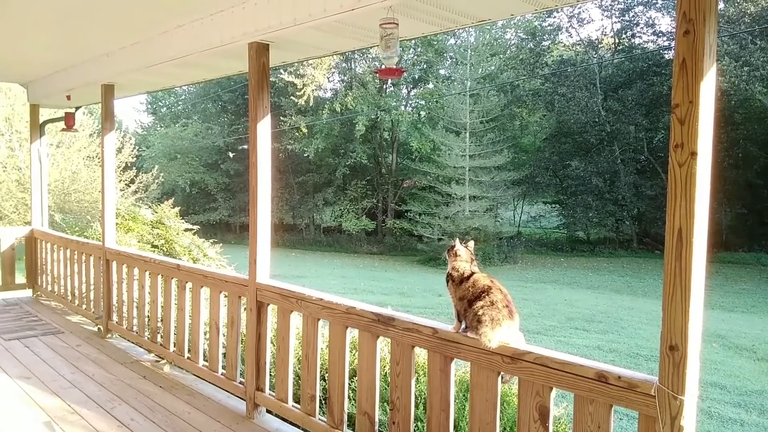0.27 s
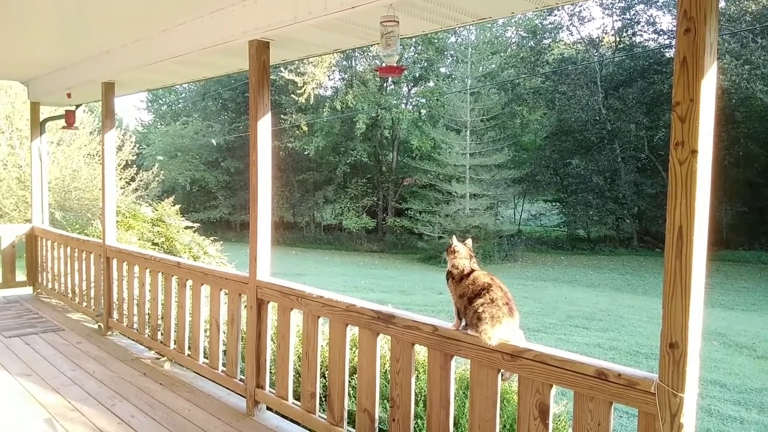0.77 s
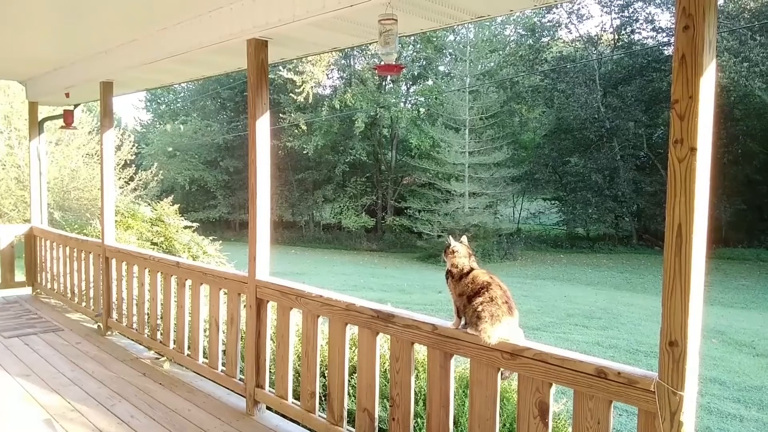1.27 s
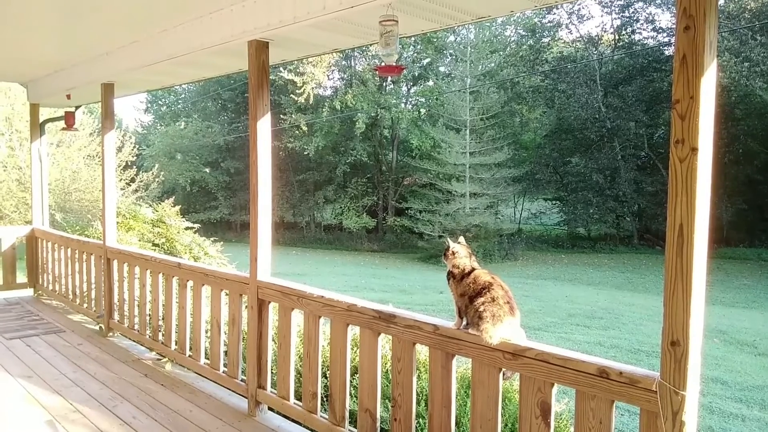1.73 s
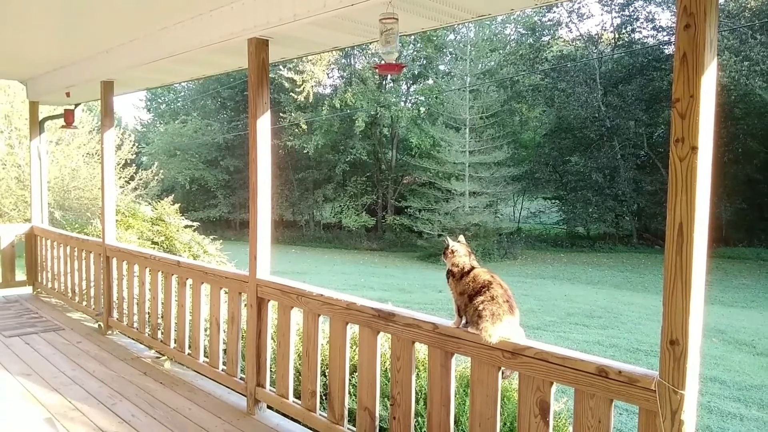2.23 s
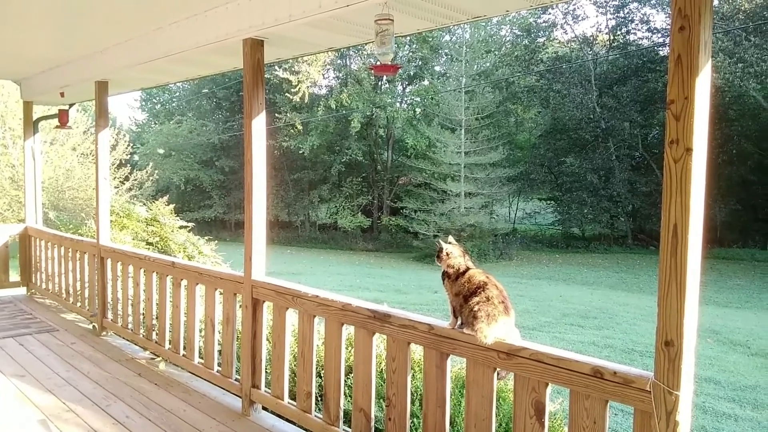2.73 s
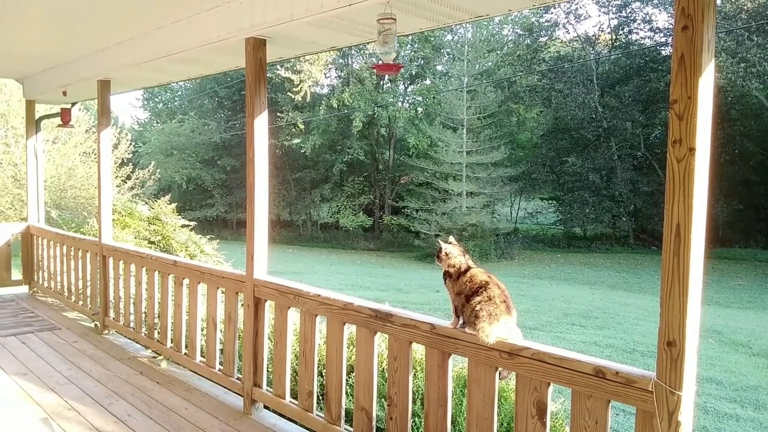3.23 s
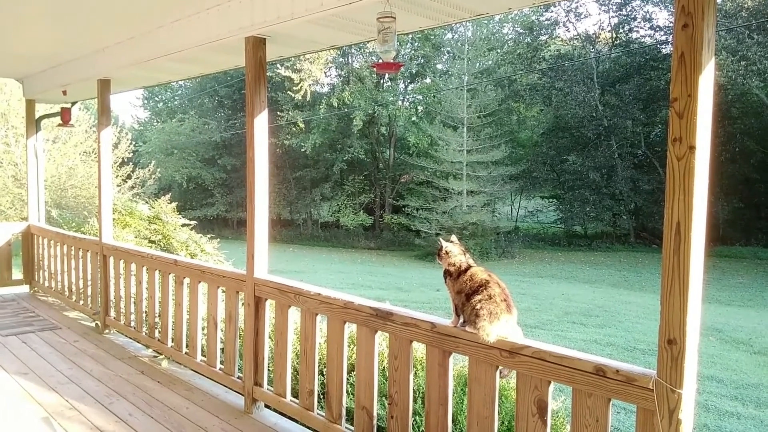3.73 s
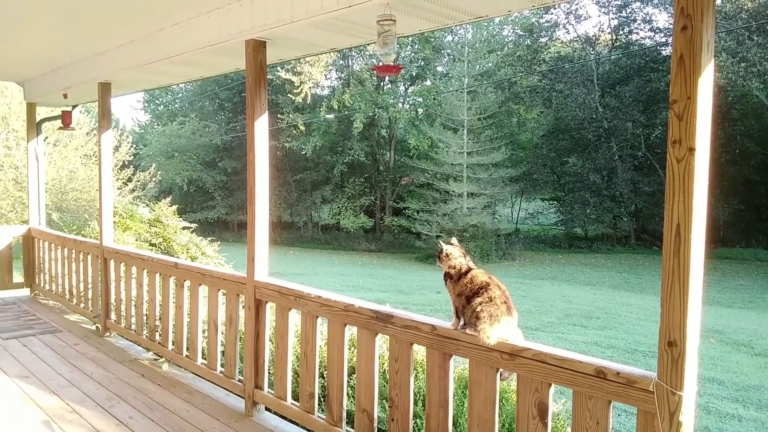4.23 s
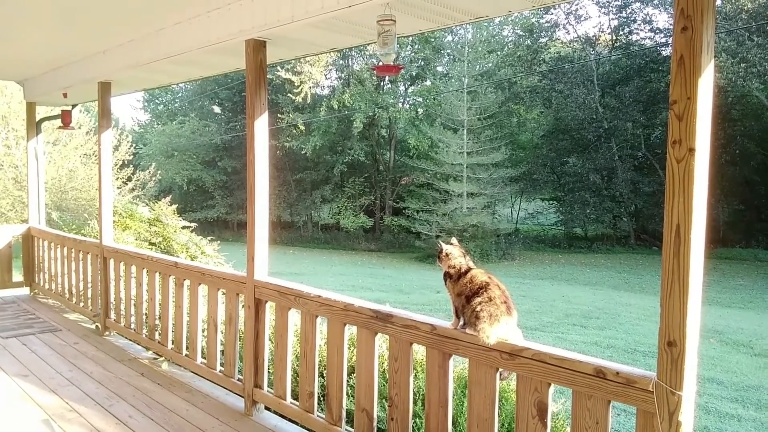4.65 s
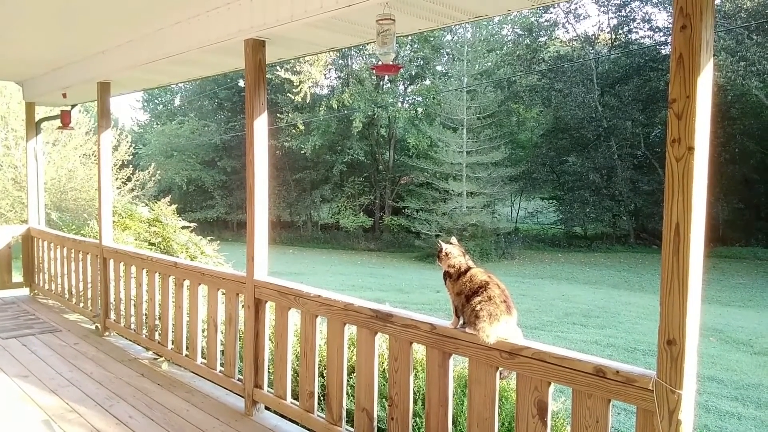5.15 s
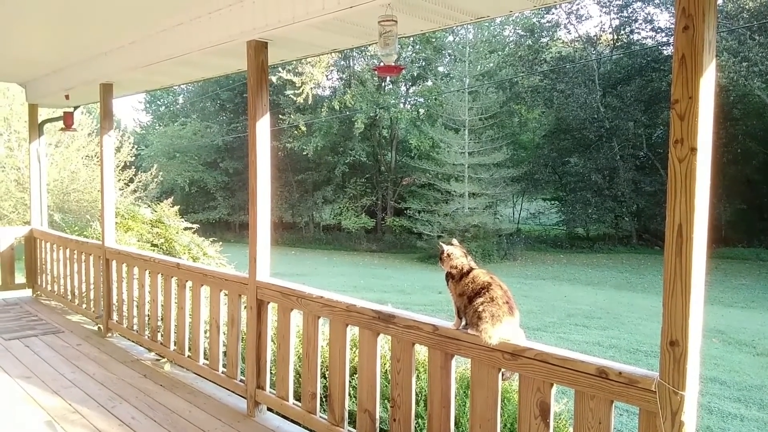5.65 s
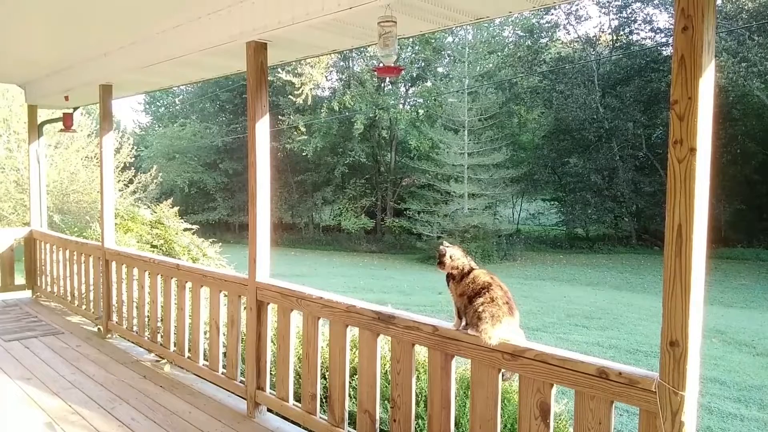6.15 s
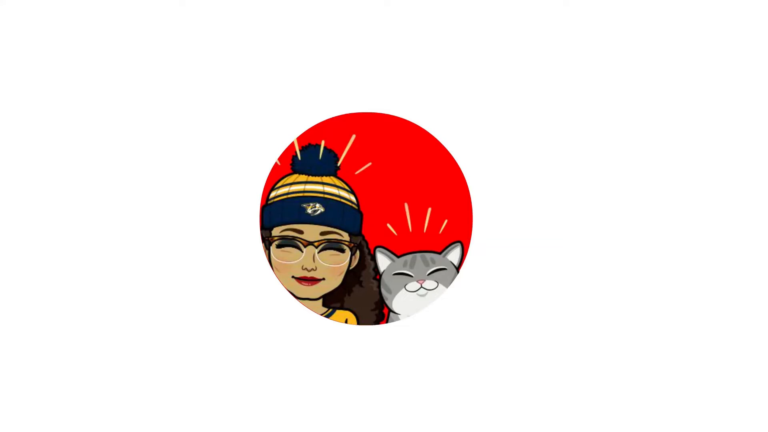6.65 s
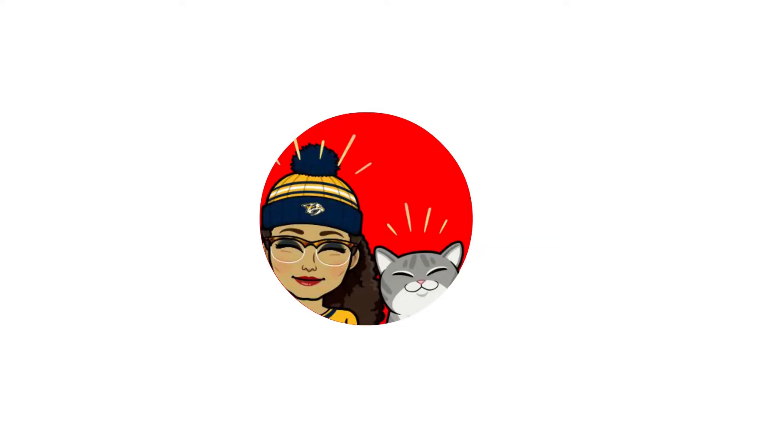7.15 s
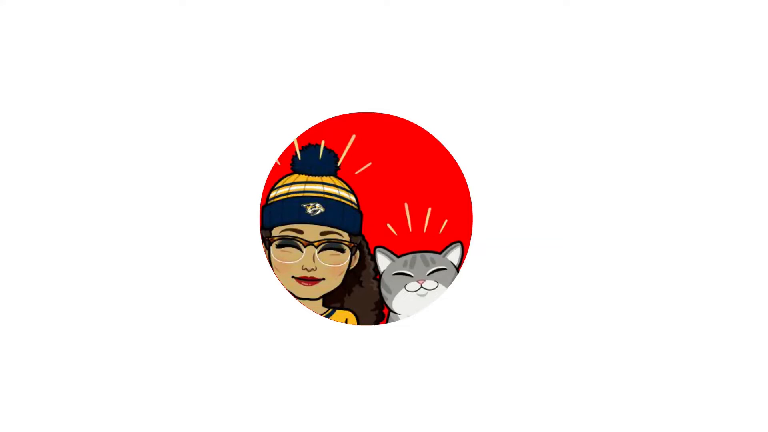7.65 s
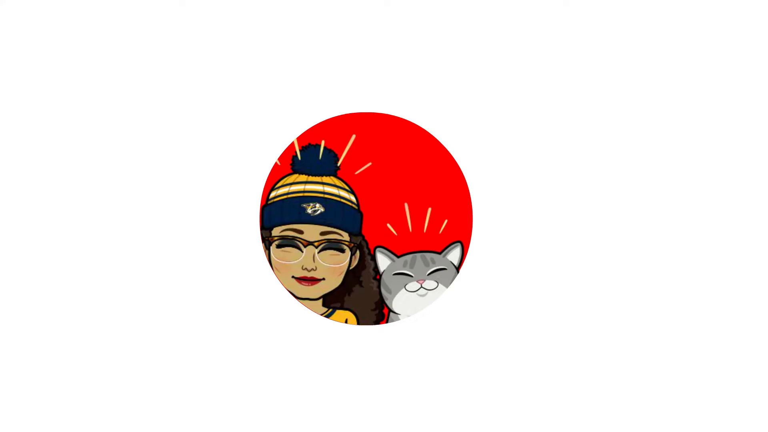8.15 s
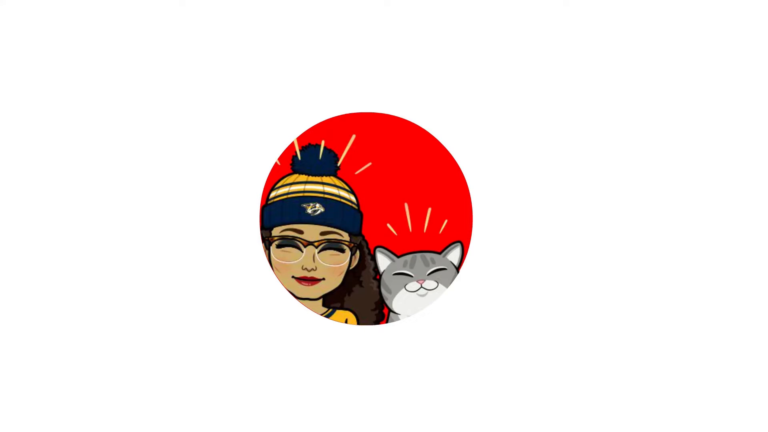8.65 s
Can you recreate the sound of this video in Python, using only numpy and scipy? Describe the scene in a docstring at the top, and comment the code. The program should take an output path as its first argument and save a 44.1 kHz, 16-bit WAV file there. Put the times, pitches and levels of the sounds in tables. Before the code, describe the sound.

On a wooden porch, hummingbirds open with a dense burst of harsh, fast-falling chips and thin peeps, wings humming low as they pass. Grass insects throb evenly around 5 kHz, with a near cricket. A faint distant songbird trills from the trees, then chips return sparsely and in a livelier flurry. Everything cuts out for an instant, after which mostly dry snaps and soft thumps sound over the insects. Handheld microphone, close birds, light porch echo.

```python
"""On a wooden porch, hummingbirds squabble round the feeders: harsh chips as swept, roughened harmonics, trembling
peeps, thin whistles and a very short tick as gliding tones, wings as pulses and noise that hum past or whirr
briefly at the clashes, and the clashes as ringing dry snaps. In the grass insects throb in step as bands of noise
with rising tones, and a near cricket chirps. A songbird repeats a phrase of quick glides from the trees, soft thumps
of low rumble reach the microphone, narrow noise swells over still air, and everything falls silent for an instant."""
import sys
import numpy as np
from scipy import signal
from scipy.fft import rfft, irfft
from scipy.io import wavfile
from scipy.ndimage import uniform_filter1d

SR = 44100
rng = np.random.default_rng(int(sys.argv[2]) if len(sys.argv) > 2 else 0)


def output_pcm(signal):
    """Save a mono or channel-first signal as 16-bit PCM at the path in sys.argv[1].

    Samples are clipped to [-1, 1] before scaling.
    """
    pcm = np.clip(np.atleast_2d(signal).T, -1, 1) * 32767
    wavfile.write(sys.argv[1], SR, np.round(pcm).astype(np.int16))


N = 392037
TIME = np.arange(N) / SR
CUTOFF_HZ = 15900  # top of the audible band in this scene


def from_db(db):
    """Decibels to amplitude gain."""
    return 10 ** (np.asarray(db) / 20)


def rms_one(x):
    """Scale to unit rms."""
    return x / np.sqrt(np.mean(x ** 2) + 1e-20)


def at_hz(points, hz):
    """Gain of a colour curve at given frequencies, joined in dB over log frequency."""
    known_hz, db = np.transpose(points)
    return from_db(np.interp(np.log(hz + 1e-9), np.log(known_hz), db))


def coloured(x, points):
    """Filter a steady sound to a colour curve; rms 1, so only the shape of the curve counts."""
    spectrum = rfft(x, 2 * N) * at_hz(points, np.fft.rfftfreq(2 * N, 1 / SR))
    return rms_one(irfft(spectrum)[:N])


def noise():
    """White noise for the whole scene."""
    return rng.standard_normal(N)


def drift(rate):
    """Random curve with this many new values per second, joined by straight lines; rms 1."""
    return rms_one(np.interp(TIME * rate, np.arange(N), noise()))


def add(out, start_s, sound):
    """Mix a sound in at a time."""
    at = int(np.clip(round(start_s * SR), 0, N))
    out[at:at + len(sound)] += sound[:N - at]


def glide(length_s, start_hz, end_hz):
    """Pitch curve and swell of one note."""
    u = np.linspace(0, 1, max(int(length_s * SR), 16))
    pitch_hz = start_hz * (end_hz / start_hz) ** u
    return pitch_hz, np.sqrt(np.abs(np.sin(np.pi * u)))


def excerpt(curve, start_s, length):
    """The stretch of a curve that lies under one note."""
    return curve[int(start_s * SR):][:length]


def phase_of(pitch_hz):
    """Running phase of a pitch curve, in radians."""
    return 2 * np.pi * np.cumsum(pitch_hz) / SR


def tail(t60_s, build_s):
    """Scattered echoes that build up and die away; energy 1."""
    t = TIME[:SR]
    echoes = rng.standard_normal(SR) * from_db(-60 * t / t60_s) * (1 - np.exp(-t / build_s))
    return echoes / np.linalg.norm(echoes)


def porch(x, ceiling_db, near_db, near_t60_s, late_db):
    """Direct sound, a ceiling bounce, the ring of the porch and a later, softer return from the garden; energy 1."""
    response = from_db(near_db) * tail(near_t60_s, 0.001) + from_db(late_db) * tail(0.21, 0.027)
    response[0] += 1
    add(response, 0.0046, from_db([ceiling_db]))
    return signal.fftconvolve(x, response / np.linalg.norm(response))[:len(x)]


# hummingbird chips: start_s [s], length_s [s], start_hz [Hz], end_hz [Hz],
# level_db [dB before swell, porch and final lift], roughness [0 clean, about 1 harsh]
CHIP_CALLS = [(0.001, 0.055, 8920, 8430, -51.5, 0.07), (0.052, 0.051, 4900, 4410, -52, 0.77),
              (0.245, 0.03, 5300, 4760, -44.5, 0.77), (0.36, 0.059, 7370, 6510, -32.5, 0.37),
              (0.393, 0.064, 3920, 3535, -41.5, 1.2), (0.482, 0.039, 4350, 2684, -35.5, 1.17),
              (0.574, 0.016, 3275, 2534, -32.5, 0.4), (0.636, 0.011, 2700, 1877, -38, 0.7),
              (0.741, 0.062, 1980, 2420, -59, 0.54), (0.784, 0.055, 2190, 2060, -50.5, 0.9),
              (0.872, 0.032, 5070, 2950, -50.5, 0.4), (2.011, 0.053, 1584, 1826, -42.5, 0.81),
              (2.019, 0.11, 8290, 8570, -42.5, 0.46), (2.204, 0.24, 3200, 3680, -59, 0.33),
              (2.33, 0.053, 2636, 2170, -52.5, 0.27), (2.804, 0.014, 2870, 2040, -56, 0),
              (2.905, 0.0053, 3000, 2320, -55, 0.5), (3.095, 0.0075, 9100, 8600, -57, 0.15),
              (3.489, .03, 2510, 2490, -60, 0.24), (3.616, 0.024, 2800, 2253, -46, 0.48),
              (3.923, 0.032, 2984, 2190, -48, 0.72), (4.244, 0.021, 2203, 1980, -51, 0.51),
              (4.497, 0.0067, 3530, 3120, -61, 0.28), (4.654, 0.033, 5200, 4760, -55.5, 0.82),
              (4.8, 0.029, 4740, 4020, -53.5, 0.9), (4.934, 0.12, 5260, 4860, -54, 0.46),
              (5.087, 0.063, 8700, 8300, -49, 0.7), (5.152, 0.07, 4780, 3170, -41, .45),
              (5.276, 0.039, 3206, 2873, -35.5, 0.67), (5.372, 0.028, 3600, 2220, -41.5, 0.86),
              (5.642, 0.033, 3400, 3140, -56.5, 0.65), (5.703, 0.014, 2280, 1860, -52, 0.35),
              (5.732, 0.0157, 2166, 1744, -51.5, 0.46), (5.755, 0.017, 2280, 2020, -51.5, 0.65),
              (5.943, 0.029, 2723, 2155, -44, 0.47), (8.394, 0.26, 5180, 5000, -53, 0.68)]
# voice colour of a chip: pitch_hz [Hz], level_db [dB, relative]
CHIP_TONE = [(1200, -41.5), (1900, 4), (3000, -12), (4200, -9.5), (5400, -2), (7100, -3.5), (8100, 6.5),
             (9200, 2), (10800, -2.5), (13000, -16), (16000, -21)]


def chips(jitter=0.0886, flutter_db=10.0, hiss=1.0):
    """A fast sweep of harmonics; an unsteady syrinx smears it, and rough chips carry hiss above the pitch."""
    out, wobble, flutter = np.zeros(N), drift(2600), np.tanh(drift(700))
    turbulence = coloured(noise(), CHIP_TONE)
    for start_s, length_s, start_hz, end_hz, level_db, rough in CHIP_CALLS:
        hz, swell = glide(length_s, start_hz, end_hz)
        phase = phase_of(hz * (1 + jitter * rough * excerpt(wobble, start_s, len(hz))))
        voice = np.zeros(len(hz))
        for k in range(1, 9):
            audible = k * hz < CUTOFF_HZ
            voice += at_hz(CHIP_TONE, k * hz) * audible * np.sin(k * phase) / k ** 0.1
        highpass = signal.butter(6, max(start_hz, end_hz), "high", fs=SR, output="sos")
        rasp = signal.sosfilt(highpass, excerpt(turbulence, start_s, len(hz)))
        call = rms_one(voice) + 2 * hiss * rough * rms_one(rasp)
        call = rms_one(call * from_db(flutter_db * excerpt(flutter, start_s, len(hz))))
        add(out, start_s, from_db(level_db) * swell ** 2 * call)
    return from_db(6.5) * porch(out, ceiling_db=-11.5, near_db=2.0, near_t60_s=0.27, late_db=-13)


# low peeps: start_s [s], length_s [s], start_hz [Hz], end_hz [Hz],
# level_db [dB before swell, porch and final lift]
PEEP_CALLS = [(0.88, 0.037, 4180, 3030, -48), (0.981, 0.035, 2840, 3230, -48),
              (1.01, 0.051, 3156, 3250, -51.5), (1.076, 0.064, 3210, 2950, -61),
              (1.798, 0.096, 2680, 2870, -64.5), (3.703, 0.0064, 2750, 2600, -50),
              (4.923, 0.021, 3250, 5220, -47.5), (4.936, 0.015, 2040, 1640, -48),
              (5.175, 0.025, 3690, 3210, -46), (5.259, 0.0252, 2380, 3310, -55),
              (5.291, .035, 3450, 3060, -45), (5.502, 0.118, 2180, 2400, -70),
              (5.708, 0.016, 2104, 1870, -55), (5.737, 0.018, 1980, 1690, -55),
              (5.764, 0.018, 2120, 1750, -58), (5.948, 0.012, 2380, 2010, -49),
              (8.683, 0.018, 3340, 3020, -47.5)]


def peeps(waver=0.052):
    """Short gliding tones with a trembling pitch and no overtones."""
    out, tremble = np.zeros(N), drift(1200)
    for start_s, length_s, start_hz, end_hz, level_db in PEEP_CALLS:
        hz, swell = glide(length_s, start_hz, end_hz)
        hz = hz * (1 + waver * excerpt(tremble, start_s, len(hz)))
        add(out, start_s, from_db(level_db) * swell * np.sin(phase_of(hz)))
    return from_db(3.0) * porch(out, ceiling_db=-26, near_db=-4.0, near_t60_s=0.12, late_db=-7.5)


# whistles, and one very short falling tick (at 4.113 s): start_s [s], length_s [s], start_hz [Hz], end_hz [Hz],
# level_db [dB before swell, porch and final lift]
THIN_NOTES = [(0, 0.0043, 6250, 6380, -42), (0.335, 0.015, 7760, 7460, -44),
              (0.349, 0.0055, 7680, 7600, -30), (0.354, 0.0099, 7200, 6450, -37),
              (0.357, 0.0049, 7950, 7510, -23), (4.113, 0.0035, 8000, 4970, -39),
              (4.979, 0.019, 6920, 7060, -48), (4.999, 0.017, 7080, 6650, -37.5),
              (8.415, 0.052, 6680, 6940, -45)]


def whistles_and_tick(octave_db=-29):
    """Nearly pure gliding notes with a faint octave; the shortest is heard as a tick."""
    out = np.zeros(N)
    for start_s, length_s, start_hz, end_hz, level_db in THIN_NOTES:
        hz, swell = glide(length_s, start_hz, end_hz)
        phase = phase_of(hz)
        tone = rms_one(np.sin(phase) + from_db(octave_db) * np.sin(2 * phase))
        add(out, start_s, from_db(level_db) * swell * tone)
    return from_db(8.5) * porch(out, ceiling_db=1.0, near_db=4.0, near_t60_s=0.21, late_db=-8.5)


# swells of the wing hum, birds passing and short low whirrs at the clashes:
# peak_s [s], hum_db [dB], half_s [s from the peak to half the amplitude]
WING_SWELLS = [(.01, -51, 0.033), (.78, -51, 0.077), (1.03, -57, 0.057), (2.1, -46.5, 0.09),
               (2.33, -54.5, 0.063), (2.52, -54.5, 0.1), (4.3, -59, 0.22), (5.17, -62, 0.3),
               (7.215, -56, 0.012), (7.38, -52.5, 0.01), (7.76, -51.5, .02), (8.56, -52, 0.015)]
# colour of the wing hum: pitch_hz [Hz], level_db [dB per Hz, relative]
WING_TONE = [(24, -28.5), (40, -5), (62, -0.5), (112, -0.5), (145, -3), (188, 0), (300, -6.5), (453, -19.5),
             (724, -28.5), (909, -23), (1350, -31), (1500, -20.5), (1950, -76)]
HOVER_DB = -65.5  # birds hovering at the feeders


def wings(beat_hz=65, swerve=0.05, swish=1.0):
    """Each stroke pushes a puff of air; the wandering hum swells as birds pass and whirrs briefly at the clashes."""
    phase = phase_of(beat_hz * (1 + swerve * drift(6.4)))
    strokes = rms_one(sum(np.cos(k * phase) for k in range(1, 13)))
    hum = coloured(strokes, WING_TONE) + swish * coloured(noise(), WING_TONE)
    power = np.full(N, from_db(HOVER_DB) ** 2)
    for peak_s, hum_db, half_s in WING_SWELLS:
        weakening = 1 + ((TIME - peak_s) / half_s) ** 2
        power += (from_db(hum_db) / weakening) ** 2
    return np.sqrt(power) * rms_one(hum)


# snaps: contact_s [s], level_db [dB drive before porch and final lift],
# body_db [dB added to the modes below body_edge_hz], ring_db [dB of porch ring against the direct sound]
SNAP_HITS = [(4.1153, -24.5, -22, 4), (6.782, -24.5, -2.5, 6.5), (6.8764, -23, -10, 4),
             (7.2063, -22.5, -2.5, 6.5), (7.7482, -15.5, -2, 3), (7.8165, -22, -9.5, 4),
             (7.9326, -21, -8.5, 8), (7.9879, -25, -6.5, 1), (8.5497, -15, -3, 0),
             (8.7252, -26.5, -2.5, 10)]
# what a snap rings with: pitch_hz [Hz], width_hz [Hz], level_db [dB, relative]
SNAP_RESONANCES = [(477, 68, 3.5), (800, 350, -0.5), (1430, 260, -1.5), (2560, 1000, -4.5), (3750, 270, -1),
                   (4900, 350, -2.5), (8650, 1460, 5), (10960, 12700, -5.5)]
GRAZE_LEAD_S = 0.0049  # the graze comes this long before the contact


def snaps(body_edge_hz=6000, vary_db=3.0, top_hz=11000, graze_db=-18):
    """Graze, sharp contact and quick rebound ring broad modes, whose levels vary as each clash hits a new spot."""
    out = np.zeros(N)
    soften = signal.butter(1, top_hz, fs=SR, output="sos")
    for contact_s, level_db, body_db, ring_db in SNAP_HITS:
        contact, ringing = np.full(SR // 2, 1e-18), np.zeros(SR // 2)
        add(contact, 0, from_db([graze_db]))
        add(contact, GRAZE_LEAD_S, [1])
        add(contact, GRAZE_LEAD_S + rng.uniform(0.00071, 0.0014), from_db([-7]))  # rebound
        for k, (hz, width_hz, mode_db) in enumerate(SNAP_RESONANCES):
            r = np.exp(-np.pi * width_hz / SR)
            poles = [1, -2 * r * np.cos(2 * np.pi * hz / SR), r * r]
            mode = signal.lfilter([1, 0, -1], poles, contact) * (1 - r * r) / 2
            drive_db = level_db + mode_db + body_db * (hz < body_edge_hz) + vary_db * rng.standard_normal()
            ringing += (-1) ** k * from_db(drive_db) * mode  # alternate signs
        ringing = signal.sosfilt(soften, ringing)
        heard = porch(ringing, ceiling_db=-2.5, near_db=ring_db, near_t60_s=0.17, late_db=-7)
        add(out, contact_s - GRAZE_LEAD_S, heard)
    return from_db(21.5) * out


# two bouts of chirping in step: first_s [s], last_s [s, upper limit], period_s [s]
CHORUS_BOUTS = [(.195, 6.2, .3685), (6.585, 8.8, .359)]


def beats():
    """Times at which the insects chirp in step."""
    return np.concatenate([np.arange(first_s, last_s, period_s) for first_s, last_s, period_s in CHORUS_BOUTS])


# strength of the chirps in step: time_s [s], level_db [dB before flicker]
CHORUS_STRENGTH = [(0, -63.5), (1.7, -53), (2.4, -51), (3.3, -55), (4.2, -48), (4.65, -50.5), (5.3, -48),
                   (5.75, -49), (6.1, -81), (6.6, -51.5), (7.3, -60), (7.7, -54), (8.4, -52.5), (8.8, -65)]
# chirps out of step: peak_s [s], level_db [dB before flicker]
LOOSE_CHIRPS = [(.11, -60), (.26, -56), (.875, -49.5), (1.32, -57), (1.45, -59), (3.069, -55),
                (3.49, -55.5), (3.619, -74), (4.955, -45.5), (5.3, -47.5), (5.79, -55.5), (5.99, -52.5),
                (6.175, -56), (6.47, -58.5), (7.37, -61.5)]
# colour of the chorus: pitch_hz [Hz], level_db [dB per Hz, relative]
CHORUS_TONE = [(3900, -34.5), (4650, -29), (4950, -10), (5200, -5), (5550, -7), (5850, -17.5),
               (6200, -23.5), (7400, -25), (8500, -31.5), (12000, -56)]
CHIRP_RISE_S, CHIRP_FALL_S = 0.029, 0.063
FAR_INSECTS_DB = -63  # the steady bed between chirps, before flicker
# a rising tone centred on each chirp, its level relative to the chirp
SLUR_S, SLUR_START_HZ, SLUR_END_HZ, SLUR_DB = 0.07, 4770, 5070, -3


def insects(flicker_db=2.5, lisp_db=-69, lisp_hz=10020, lisp_width_hz=70):
    """Many stridulating wings merge into a band throbbing with slurred chirps; one insect lisps higher, evenly."""
    in_step = [(s, np.interp(s, *np.transpose(CHORUS_STRENGTH))) for s in beats()]
    power, slurs = np.full(N, from_db(FAR_INSECTS_DB) ** 2), np.zeros(N)
    hz, swell = glide(SLUR_S, SLUR_START_HZ, SLUR_END_HZ)
    slur = swell * np.sin(phase_of(hz))
    for peak_s, level_db in in_step + list(LOOSE_CHIRPS):
        near = slice(max(int((peak_s - 0.5) * SR), 0), int((peak_s + 0.5) * SR))
        t = TIME[near] - peak_s
        width_s = np.where(t < 0, CHIRP_RISE_S, CHIRP_FALL_S)
        power[near] += from_db(level_db) ** 2 * np.exp(-(t / width_s) ** 2)
        add(slurs, peak_s - SLUR_S / 2, from_db(level_db + SLUR_DB) * slur)
    chorus = np.sqrt(power) * coloured(noise(), CHORUS_TONE) + slurs
    chorus = chorus * from_db(flicker_db * drift(60))
    pulse = np.cos(np.pi * (TIME - 0.255) / 0.374) ** 24  # one lisp every 0.374 s
    lisp = np.sin(phase_of(lisp_hz + lisp_width_hz * drift(300)))
    return chorus + from_db(lisp_db) * pulse * rms_one(lisp)


# cricket chirps: start_s [s], level_db [dB before swell, tremble, echo and final lift]
CRICKET_CHIRPS = [(.08, -63), (.46, -56), (.645, -51.5), (.86, -45), (1.32, -61), (1.975, -46), (2.29, -51),
                  (2.355, -46), (2.48, -52.5), (2.63, -48), (2.755, -55), (2.95, -53.5), (3.12, -51),
                  (3.62, -58), (4.26, -50), (4.605, -52), (5.76, -54), (7.98, -50.5), (8.74, -51)]


def crickets(length_s=0.041, pitch_hz=4955, waver=0.006, tremble_db=2.0):
    """One near cricket gives short, slightly trembling chirps, with a light echo."""
    out, wobble = np.zeros(N), drift(200)
    for start_s, level_db in CRICKET_CHIRPS:
        hz, swell = glide(length_s, pitch_hz, pitch_hz)
        hz = hz * (1 + waver * excerpt(wobble, start_s, len(hz)))
        add(out, start_s, from_db(level_db) * swell ** 2 * np.sin(phase_of(hz)))
    out = out * from_db(tremble_db * drift(120))
    echo = signal.fftconvolve(out, tail(0.29, 0.0068))[:N]
    return from_db(5.5) * (out + from_db(-7) * echo)


# notes of the song phrase: delay_s [s into the phrase], length_s [s], start_hz [Hz], end_hz [Hz],
# level_db [dB relative to the phrase]
SONG_PHRASE = [(.004, 0.0085, 4634, 2894, 2.5), (0.012, 0.01106, 2964, 4710, 3),
               (0.025, 0.0101, 4790, 2900, 9), (.05, 0.01, 2920, 4780, -8.5),
               (0.102, .015, 4200, 2900, -6.5), (.14, 0.01465, 2980, 4070, 1),
               (.18, 0.0425, 2739, 3095, 1.5)]
SONG_START_S, PHRASE_PERIOD_S = 1.895, 0.283
SONG_DB = -49  # phrase level before the direct and echo gains
SONG_GROWS_DB_PER_S, SONG_FULL_AT_S = 13, 1.97  # it starts softly
SONG_FADES_AT_S, SONG_FADE_DB_PER_S = 2.855, 22  # and fades towards the end


def songbird(waver=0.066, direct_db=-5, echo_db=1.0, count=7):
    """A far, trilled song that repeats evenly, blurred by echoes from the wood it comes from."""
    notes, waves = np.zeros(N), drift(500)
    for phrase_s in SONG_START_S + PHRASE_PERIOD_S * np.arange(count):
        growth_db = SONG_GROWS_DB_PER_S * max(SONG_FULL_AT_S - phrase_s, 0)
        fade_db = SONG_FADE_DB_PER_S * max(phrase_s - SONG_FADES_AT_S, 0)
        phrase_db = SONG_DB - growth_db - fade_db
        for delay_s, length_s, start_hz, end_hz, level_db in SONG_PHRASE:
            hz, swell = glide(length_s, start_hz, end_hz)
            hz = hz * (1 + waver * excerpt(waves, phrase_s, len(hz)))
            add(notes, phrase_s + delay_s, from_db(phrase_db + level_db) * swell * np.sin(phase_of(hz)))
    echo = signal.fftconvolve(notes, tail(1.0, 0.0011))[:N]
    return from_db(direct_db) * notes + from_db(echo_db) * echo


# soft low thumps: start_s [s], level_db [dB before the trim]
THUMP_HITS = [(0.73, -44), (1.069, -47), (2.291, -46), (2.605, -60), (3.245, -48), (4.357, -55),
              (5.432, -46.5), (5.76, -45), (6.154, -49), (6.553, -46.5), (6.982, -43), (7.236, -48),
              (7.805, -45.5), (7.986, -44.5), (8.152, -48.5), (8.369, -49.5), (8.575, -42.5),
              (8.723, -47.5)]
# colour of a thump: pitch_hz [Hz], level_db [dB per Hz, relative]
THUMP_TONE = [(15, -24), (30, -22), (55, 1), (90, -3), (150, -12), (300, -17), (800, -56)]


def thumps(rise_s=0.021, trim_db=-6):
    """Dull bumps on the hand-held microphone: low rumble that swells quickly and dies."""
    strength, u = np.zeros(N), TIME[:SR // 2] / rise_s
    swell = (u * np.exp(1 - u)) ** 2
    for start_s, level_db in THUMP_HITS:
        add(strength, start_s, from_db(level_db + trim_db) * swell)
    return strength * coloured(noise(), THUMP_TONE)


# faint swells of narrow noise, heard as rustle, insect hiss and blurred far calls:
# start_s [s], length_s [s], centre_hz [Hz], level_db [dB before swell]
NOISE_SWELLS = [(0.011, 0.12, 1510, -68.5), (.75, .1, 3820, -54.5), (0.962, 0.14, 6350, -59),
                (1.095, 0.34, 2100, -68.5), (1.596, .16, 6500, -63), (1.966, .08, 6350, -53),
                (2.034, 0.17, 654, -62.5), (2.099, 0.25, 10600, -52.5), (2.613, 0.11, 6600, -58.5),
                (3.06, 0.18, 13800, -61), (3.78, 0.18, 2870, -63), (3.891, 0.12, 7200, -55),
                (4.611, 0.091, 500, -61), (5.376, 0.15, 2320, -61.5), (6.961, 0.058, 1110, -53.5),
                (6.969, 0.15, 6100, -63), (6.991, .2, 1970, -67.5), (7.025, 0.16, 320, -56),
                (8.095, 0.1, 6700, -54)]


def faint_swells(width=0.18):
    """Faint swells of band-passed noise: rustle, insect hiss and blurred far calls."""
    out = np.zeros(N)
    for start_s, length_s, centre_hz, level_db in NOISE_SWELLS:
        edges_hz = centre_hz * np.exp([-width, width])
        bandpass = signal.butter(2, edges_hz, "band", fs=SR, output="sos")
        band = signal.sosfilt(bandpass, rng.standard_normal(SR))
        swell = signal.windows.tukey(int(length_s * SR), 0.8)
        settled = rms_one(band[-len(swell):])  # the end, where the filter has settled
        add(out, start_s, from_db(level_db) * swell * settled)
    return out


# colour of the still air: pitch_hz [Hz], level_db [dB per Hz, relative]
AIR_TONE = [(15, -11.5), (25, -48), (87, 13), (141, -13.5), (242, 3.5), (531, -5), (1020, -10.5),
            (3720, -17), (4610, -10.5), (5280, -17.5), (6210, -17), (10100, -15), (11600, -19.5),
            (13200, -43.5), (16000, -55.5)]


def still_air(level_db=-64):
    """Steady coloured noise: the still air of the garden."""
    return from_db(level_db) * coloured(noise(), AIR_TONE)


def scene():
    """Birds and insects over the still air of the garden."""
    porch_birds = chips() + peeps() + whistles_and_tick() + wings() + snaps()
    garden = insects() + crickets() + songbird()
    background = thumps() + faint_swells() + still_air()
    return (porch_birds + garden + background)[None]


# the instant of silence: start_s [s], end_s [s]
SILENT_INSTANT = (6.264, 6.353)


def record(dry):
    """Everything drops out briefly with softened edges, and the treble above the cutoff is removed."""
    start_s, end_s = SILENT_INSTANT
    sounding = 1.0 * ((TIME < start_s) | (TIME > end_s))
    gate = uniform_filter1d(sounding, size=128)
    lowpass = signal.ellip(10, 0.1, 80, CUTOFF_HZ, fs=SR, output="sos")
    return signal.sosfilt(lowpass, dry * gate)


dry = scene()
out = record(dry)
output_pcm(out)
```